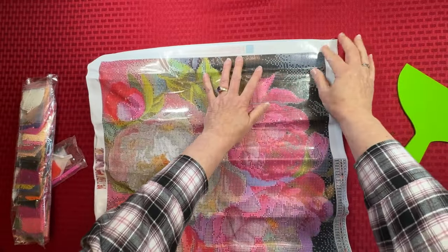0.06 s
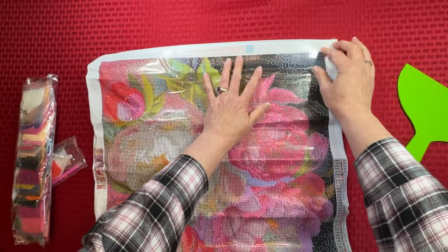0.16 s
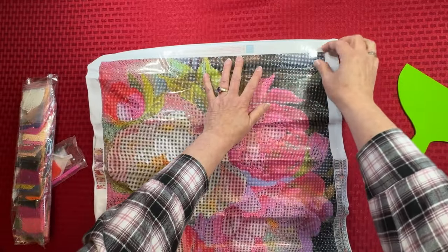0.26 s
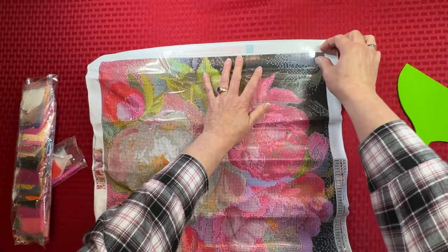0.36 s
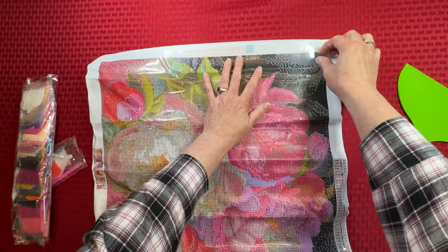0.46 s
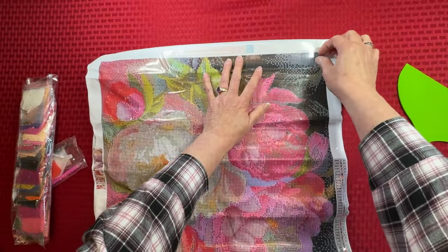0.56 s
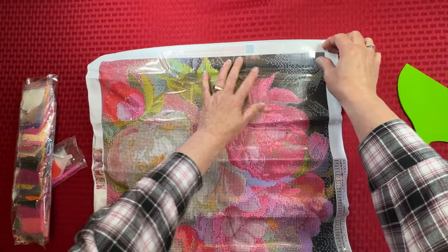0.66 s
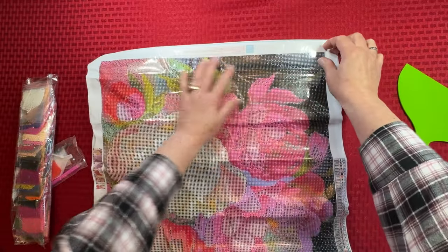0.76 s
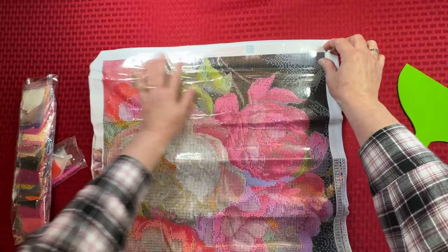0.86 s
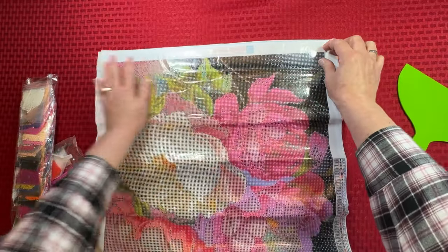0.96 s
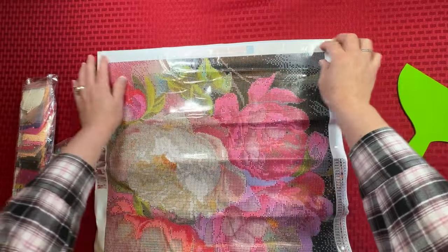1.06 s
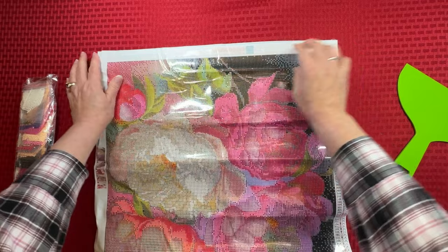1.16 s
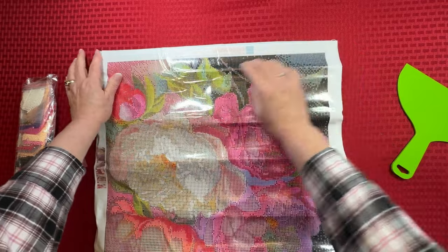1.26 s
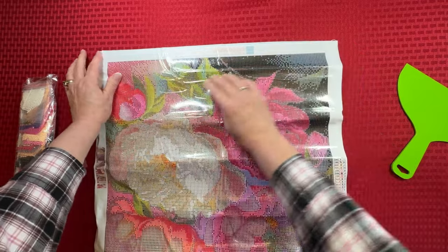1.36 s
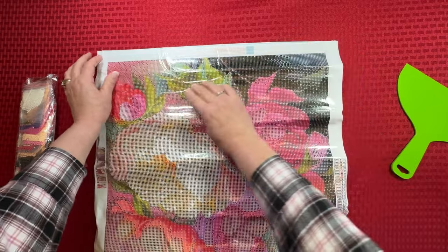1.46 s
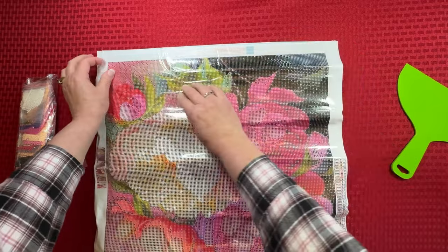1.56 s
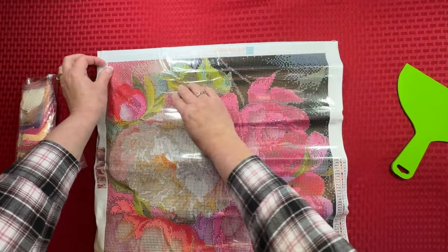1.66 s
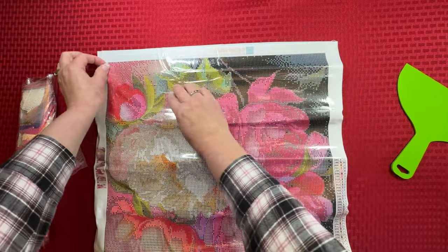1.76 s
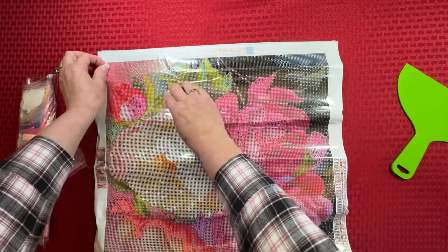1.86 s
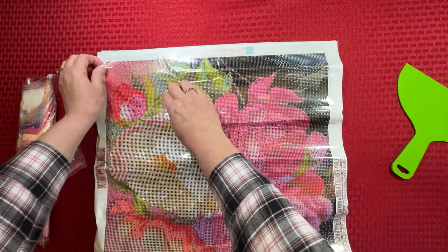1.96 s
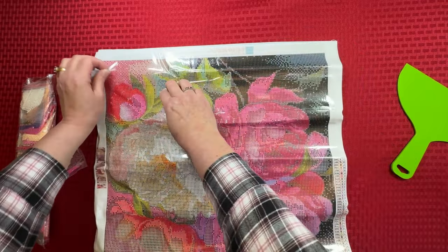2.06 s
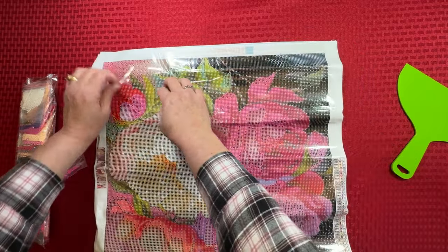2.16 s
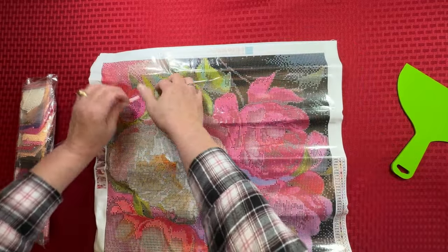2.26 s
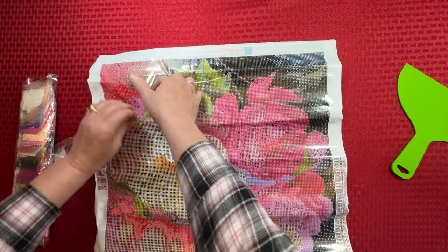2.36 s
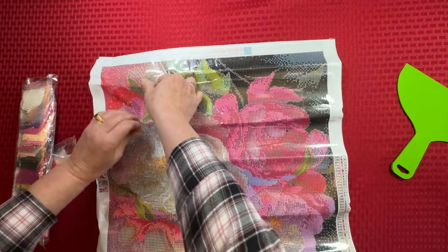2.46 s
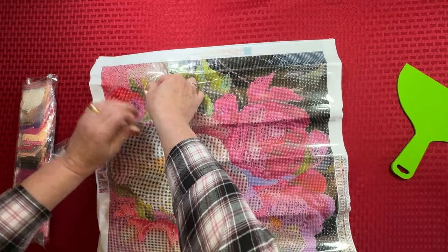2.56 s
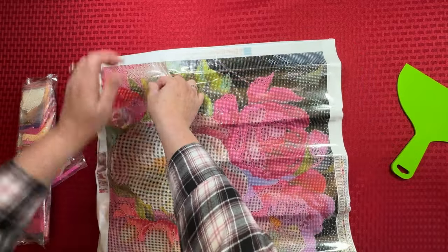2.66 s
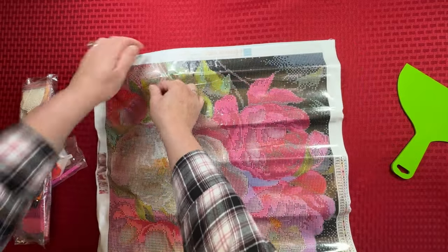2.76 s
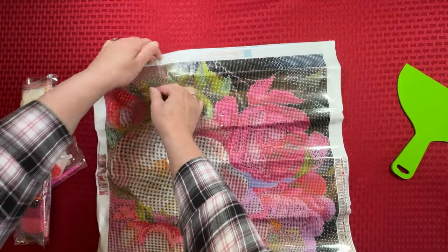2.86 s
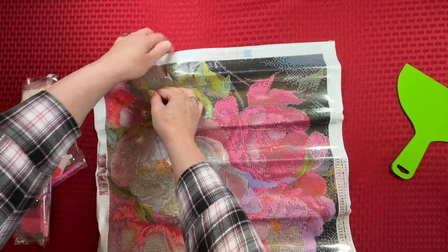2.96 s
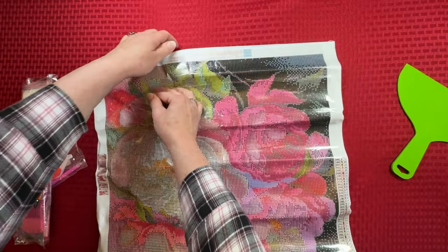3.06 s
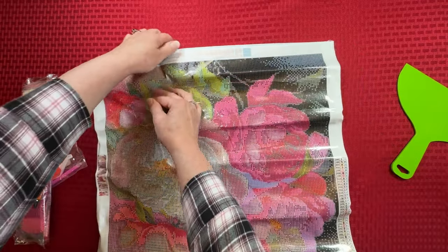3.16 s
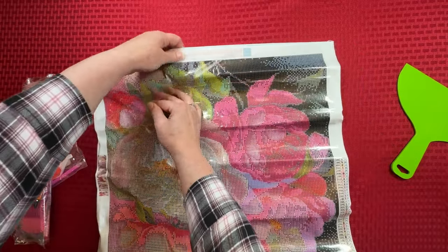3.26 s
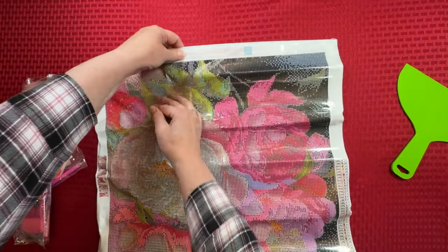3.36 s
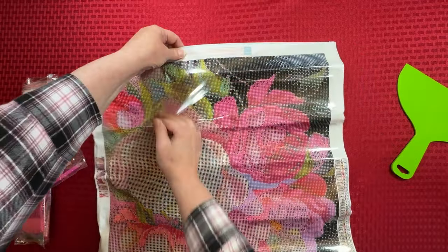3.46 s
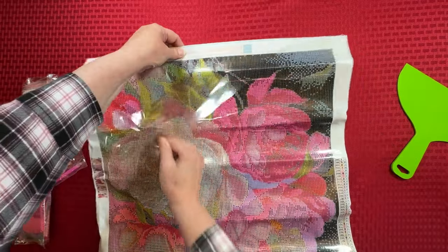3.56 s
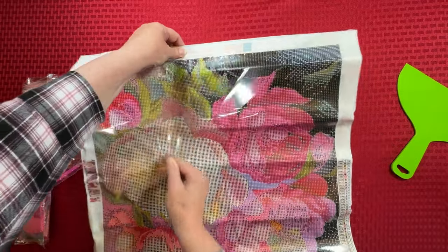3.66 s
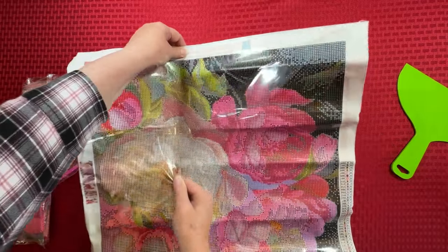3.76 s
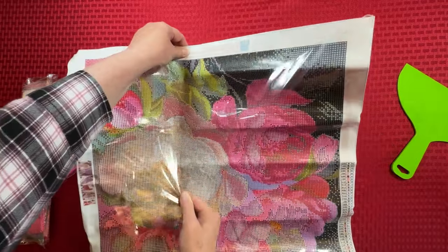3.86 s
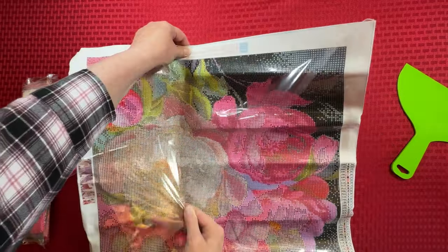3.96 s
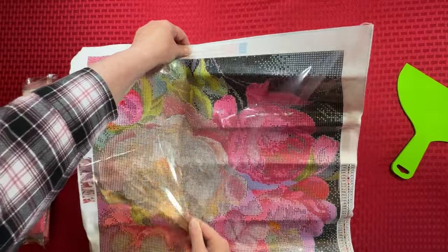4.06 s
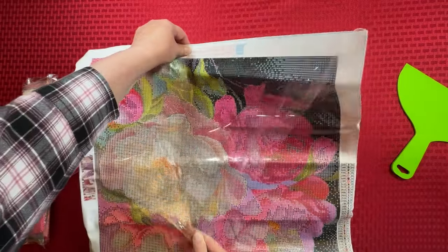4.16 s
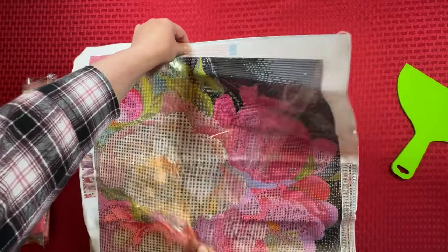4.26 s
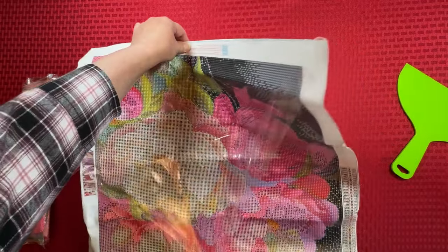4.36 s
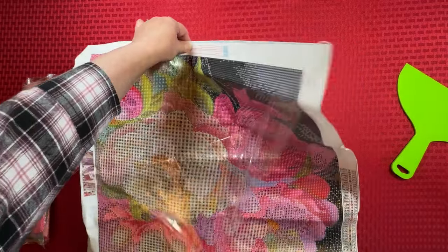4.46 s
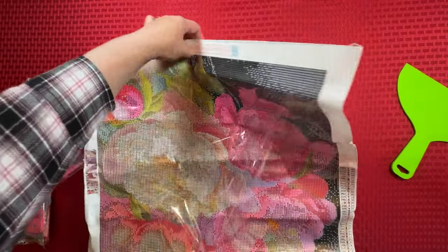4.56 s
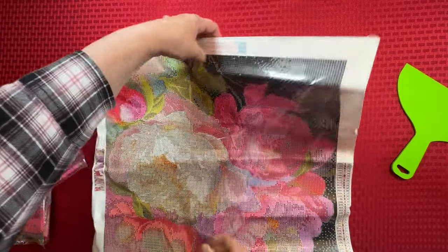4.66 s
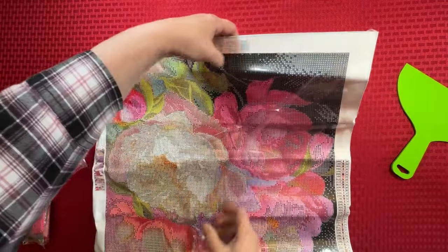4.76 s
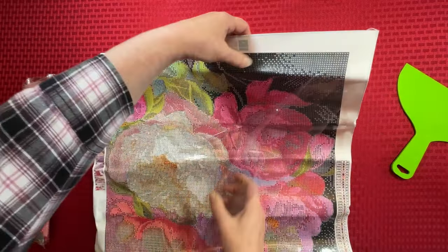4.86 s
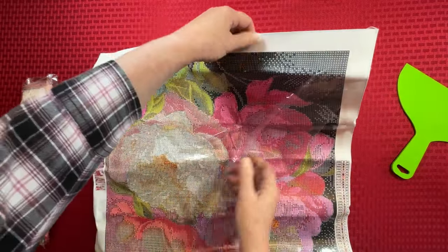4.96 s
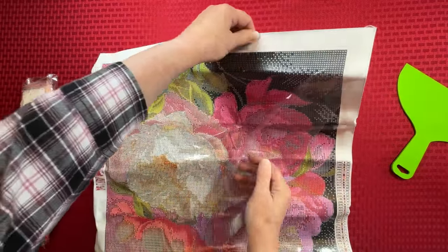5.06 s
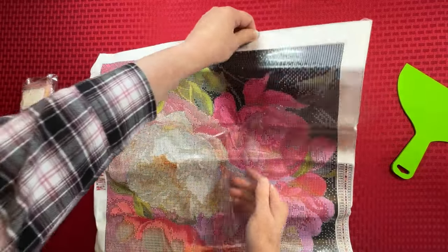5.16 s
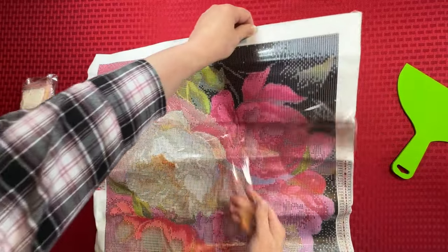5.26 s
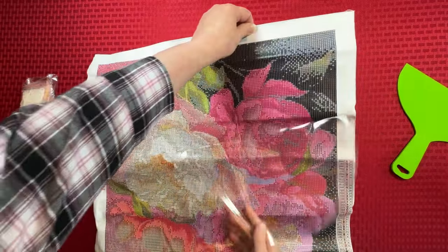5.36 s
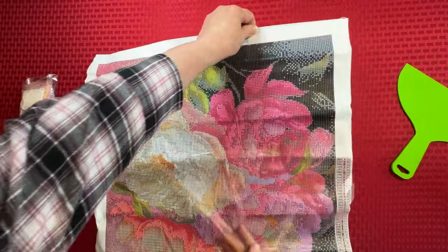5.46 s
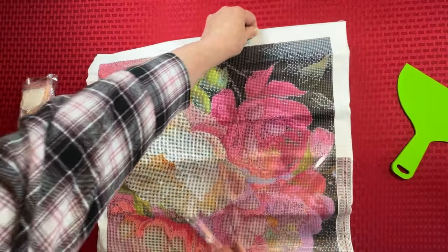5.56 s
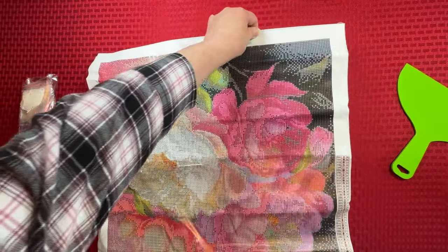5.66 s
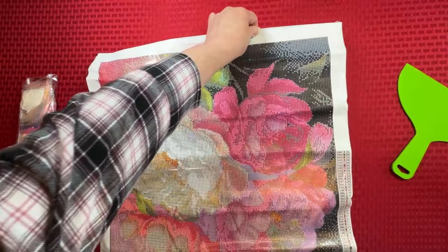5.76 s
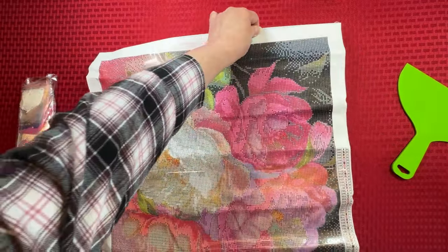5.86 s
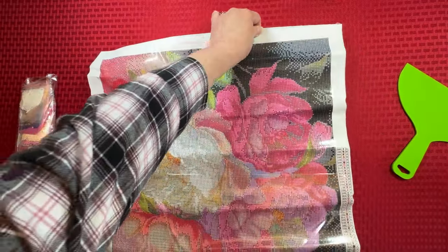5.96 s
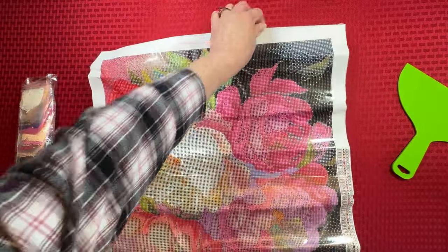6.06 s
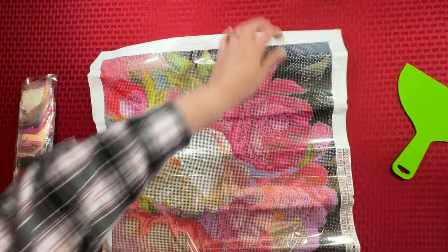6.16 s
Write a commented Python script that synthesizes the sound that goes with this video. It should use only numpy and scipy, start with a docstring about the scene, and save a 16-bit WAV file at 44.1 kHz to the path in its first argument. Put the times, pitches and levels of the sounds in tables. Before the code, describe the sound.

Close stereo microphones in a small, quiet room with low rumble and faint hum. Hands barely rustle thin plastic film and pat softly on a padded table. Crisp ticks gather into brisk crinkles as the film is picked at, then a rough peeling rustle with sharp snaps pulls slightly rightward. Louder crackles and crumples follow, easing toward the end.

```python
"""Clear plastic film crinkles as hands smooth a craft canvas, pick at its cover film and peel it back.
Creases are short resonant bursts of noise: many tiny ones crinkle, large ones snap, and runs of them crumple.
Rubbing and flutter are rough, coloured noise; ringing resonances add the film's own pitch and thin whistles.
Soft, quickly damped knocks make the hollow flexes of the sheet and the pats of hands on a padded table.
A small room adds short reflections, with a low rumble and hum behind a close pair of microphones."""
import sys
import numpy as np
from scipy import signal
from scipy.fft import rfft, irfft, next_fast_len
from scipy.io import wavfile
from scipy.ndimage import uniform_filter1d

SR = 44100
rng = np.random.default_rng(int(sys.argv[2]) if len(sys.argv) > 2 else 0)


def unload_audio(sound):
    """Save the sound as a 16-bit wav file, at the path given as the first command line argument."""
    columns = np.transpose(np.atleast_2d(sound))
    # keep every value between -1 and 1, then stretch to whole-number steps
    steps = np.round(np.clip(columns, -1, 1) * 32767)
    wavfile.write(sys.argv[1], SR, steps.astype(np.int16))


N = 273537
TIME = np.arange(N) / SR

# Levels of the film and hands are those before the room and the microphones.

# Moves of the hands on the film. Each row: time of full strength in seconds, rise in seconds,
# hold in seconds, release in dB per second, crinkle level in dB, rubbing level in dB,
# brightness in dB per octave.
STROKES = [(0.007, 0.16, 0.093, 36, -57, -62, 11), (0.619, 0.01, 0.0082, 120, -60.5, -68, 0),
           (0.805, 0.11, 0.091, 70.5, -44, -55.5, 3.5), (1.35, 0.1, 0.13, 76, -59.5, -64, 18),
           (1.565, 0.0096, 0.012, 160, -42.5, -54, 0.5), (1.927, 0.081, 0.015, 173, -46, -64.5, 10),
           (2.006, 0.011, 0.0072, 152, -48, -52, 9), (2.134, 0.14, 0.028, 138, -33, -48, -2.5),
           (2.3, 0.15, 0.035, 74, -30.5, -46.5, -1), (2.574, 0.01, 0.0045, 308, -33, -52.5, -4.5),
           (2.879, 0.21, 0.011, 117, -39, -45, 1.5), (3.022, 0.018, 0.015, 67, -43, -47.5, 6),
           (3.238, 0.07, 0.33, 65, -42.5, -49.5, -2.5), (4.567, 0.22, 0.17, 102, -34, -42, -1),
           (4.866, 0.057, 0.13, 282, -41.5, -49.5, -0.5), (5.146, 0.084, 0.013, 90, -26, -35.5, -5.5),
           (5.279, 0.081, 0.02, 106, -24, -36.5, -1), (5.505, 0.84, 0.0058, 35, -34, -49, 2.5),
           (5.888, 1, 0.02, 112, -44, -56.5, 0.5), (6.121, 0.025, 0.019, 55, -44.5, -56.5, -0.5)]
RISE_DB = 23.5   # a move swells by this much during its rise
# The long pull that peels the film back. Each row: time in seconds, crinkle level in dB and
# rubbing level in dB, both before the trim below.
PEEL = [(3.452, -35, -46), (3.836, -34, -36.5), (3.875, -27.5, -33), (3.988, -36, -36.5), (4.068, -29, -34),
        (4.201, -33.5, -33.5), (4.26, -27, -33.5), (4.48, -39.5, -53.5)]
# Trim of the peel: crinkle in dB, then rubbing in dB.
PEEL_TRIM_DB = (1, -3.5)
PEEL_FADE_DB_PER_S = 251   # how fast the pull starts and stops
# Tone of the crinkling. Each row: frequency in Hz, relative level in dB.
CRINKLE_COLOUR = [(900, 4.5), (2000, -3.5), (4000, -5), (8300, -0.5), (9400, -11.5), (10600, 6),
                  (15500, -7.5)]
# Single creases snapping through. Each row: start in seconds, peak in dB, pitch in Hz.
SNAPS = [(0.1111, -35, 7100), (0.7816, -21, 11300), (0.8044, -14.5, 11700), (0.956, -22.5, 10700),
         (1.3845, -22.5, 15400), (1.509, -34.5, 3500), (1.6132, -22, 10600), (1.9458, -16.5, 7240),
         (2.0088, -13, 7100), (2.0178, -19.5, 7880), (2.2518, -13, 7900), (2.4304, -16.5, 11100),
         (2.446, -12.5, 6000), (2.4704, -24, 10800), (2.4942, -17, 10500), (2.5536, -24, 3430),
         (2.7598, -20, 6200), (2.7835, -27.5, 4800), (2.8943, -17.5, 6470), (2.9145, -20.5, 3030),
         (2.9612, -21.5, 7940), (3.0022, -22, 10500), (3.0165, -15.5, 7200), (3.1098, -17.5, 7400),
         (3.1288, -23, 10600), (3.1588, -16.5, 7900), (3.235, -14, 8160), (3.2464, -19, 7190),
         (3.2862, -18, 3800), (3.3428, -12, 10200), (3.3488, -18, 10700), (3.4602, -10.5, 10400),
         (3.8718, -8, 10900), (4.4468, -17.5, 11000), (4.523, -10.5, 6200), (4.665, -5, 6700),
         (4.6914, -7, 10700), (4.7144, -12.5, 6060), (4.758, -20, 7620), (4.7714, -21, 3470),
         (4.883, -15.5, 10800), (5.2265, -12, 6070), (5.5039, -15, 10720), (6.126, -11.5, 15500)]
# Several creases giving way in a run. Each row: start in seconds, peak in dB, length in seconds,
# pitch in Hz.
CRUMPLES = [(1.571, -23.5, 0.0049, 6130), (1.771, -22, 0.0017, 6900), (2.6417, -13.5, 0.0027, 5630),
            (3.3225, -16.5, 0.0035, 5050), (3.434, -14, 0.0033, 9100), (3.86, -10, 0.0044, 10300),
            (4.6134, -14.5, 0.0072, 7040), (5.062, -22, 0.0072, 6476), (5.2785, -13.5, .008, 9550)]
# Tone of the rubbing. Each row: frequency in Hz, relative level in dB.
RUBBING_COLOUR = [(400, -16), (850, -5), (1080, -4.5), (1350, 1), (1900, -2), (2700, -4.5), (4500, -5),
                  (9000, -61)]
# Tone of the sheet's low flutter. Each row: frequency in Hz, relative level in dB.
FLUTTER_COLOUR = [(100, -10), (200, -3), (330, -6), (450, 2), (570, -8.5), (800, 1.5), (1080, -1.5),
                  (2200, -13)]
FLUTTER_DB = -3   # relative to the rubbing
# Main resonance of the rubbed film, lower when more of it hangs loose. Each row: time in seconds,
# pitch in Hz, level in dB above the rubbing.
FILM_RESONANCE = [(0.9, 1770, -2.5), (1.28, 1402, -0.5), (3.42, 1340, 0), (3.6, 919, -2.5),
                  (3.95, 827, -1.5), (4.5, 847.3, -31), (5.2, 862, 0.5), (5.6, 867, -24)]
# Thin whistles of sliding film. Each row: start in seconds, end in seconds, level at the start in dB,
# fade in dB per second (negative swells).
WHISTLES = [(0.05, 0.63, -69.5, -3), (4.576, 5.067, -38.5, 46)]
WHISTLE_HZ, WHISTLE_WIDTH_HZ = 1924, 120
# The sheet flexing with a hollow pop. Each row: start in seconds, peak in dB, pitch in Hz.
FLEXES = [(1.284, -38, 1320), (1.331, -45, 1350), (2.866, -23.5, 1120), (2.974, -33.5, 1240),
          (3.324, -29, 1470), (4.649, -21, 1430)]
# Hands and canvas landing on the table. Each row: start in seconds, peak in dB, pitch in Hz.
PATS = [(0.26, -50, 223), (0.371, -41.5, 245), (0.44, -42.5, 180), (0.619, -48, 216), (1.595, -36, 228),
        (1.63, -45, 160), (2.821, -31.5, 137), (4.649, -37, 286)]
ROOM_T60_S = 0.22   # time for the room's tail to fall by 60 dB
WANDER_PER_S = 25   # how often the sound heads for another place on the film
# The sound moves to the right during the peel. Each row: time in seconds, lag of the left
# microphone in seconds.
LEFT_LAG = [(2.0, -.00004), (4.2, .00017)]
# Tone difference of the microphone pair, which each side takes a share of. Each row: frequency in Hz,
# left minus right in dB before those shares.
BALANCE = [(150, 0), (700, -4.5), (1300, -1.5), (2400, -0.5), (5000, -4.5), (10000, 1.5)]
# Tone of the background rumble. Each row: frequency in Hz, relative level in dB.
RUMBLE_COLOUR = [(35, -18), (60, -0.5), (135, -1.5), (180, -10), (300, -15), (600, -26), (2000, -35.5),
                 (9000, -42.5)]
RUMBLE_DB, HUM_HZ, HUM_DB = -55, 131.4, -60.5   # levels before the microphone ports
# Tone of the microphone ports. Each row: frequency in Hz, gain in dB; the end values carry on outwards.
PORTS = [(11500, 3), (12400, -6), (13300, -32), (14200, 12.5), (15600, 11)]
CUTOFF_HZ = 16100


def from_db(db):
    """Turn decibels into a gain."""
    return 10 ** (np.asarray(db) / 20)


def rms_one(x):
    """Scale a sound so that its average strength (rms) is 1."""
    return x / np.sqrt(np.mean(x ** 2) + 1e-20)


def in_time(rows):
    """Join the rows of a table by straight lines over time, one curve per column."""
    s, *columns = np.transpose(rows)
    return [np.interp(TIME, s, column) for column in columns]


def drift(rate):
    """Wander at random around 0 with a spread of about 1, taking a new target `rate` times a second."""
    knots = rng.standard_normal(4096)
    return np.interp(TIME * rate, np.arange(len(knots)), knots)


def pair(alike, size):
    """Left and right white noise; alike runs from 0 (unrelated) to 1 (the same)."""
    mid, side = rng.standard_normal((2, size))
    alike = np.clip(alike, 0, 1)
    return np.sqrt(1 + alike) * mid + np.sqrt(1 - alike) * side * [[1], [-1]]


def colour(x, points, amount=1):
    """Change the tone along a curve of Hz and dB, joined over the logarithm of frequency."""
    hz, level_db = np.transpose(points)
    size = next_fast_len(N + 4096)
    bins_hz = np.maximum(np.arange(size // 2 + 1) * SR / size, 1)
    gain = from_db(amount * np.interp(np.log(bins_hz), np.log(hz), level_db))
    return irfft(rfft(x, size) * gain, size)[..., :N]


def low_pass(x, order, cutoff_hz):
    """Soften everything above the cutoff."""
    return signal.sosfilt(signal.butter(order, cutoff_hz, fs=SR, output="sos"), x)


def resonate(x, hz, width_hz):
    """Ring at one pitch, like a damped spring, with gain 1 at the top of the resonance."""
    r = np.exp(-np.pi * width_hz / SR)
    forward = np.array([1, 0, -1]) * (1 - r * r) / 2
    feedback = [1, -(1 + r * r) * np.cos(2 * np.pi * hz / SR), r * r]
    return signal.lfilter(forward, feedback, x)


def add(out, s, sound, peak_db):
    """Place a stereo sound at a time with a given peak."""
    at = max(round(s * SR), 0)
    scaled = from_db(peak_db) * sound / np.abs(sound).max()
    out[:, at:at + sound.shape[1]] += scaled[:, :N - at]


def handling():
    """Crinkle dB, rubbing dB and brightness: each move swells, holds and dies away; the peel adds its pull."""
    s = np.transpose(PEEL)[0]
    outside_s = np.abs(TIME - np.clip(TIME, s[0], s[-1]))   # time before the peel's start or after its end
    peel_db = np.array(in_time(PEEL)) + np.array(PEEL_TRIM_DB)[:, None]
    power = from_db(peel_db - PEEL_FADE_DB_PER_S * outside_s) ** 2
    bright = 0
    for s, rise_s, hold_s, release, crinkle_db, rubbing_db, brightness in STROKES:
        swell_db = -RISE_DB * np.maximum(s - TIME, 0) / rise_s
        shape_db = swell_db - release * np.maximum(TIME - s - hold_s, 0)
        move = from_db(shape_db + np.array([[crinkle_db], [rubbing_db]])) ** 2
        power = power + move
        bright = bright + brightness * move[0]   # stronger moves count for more
    crinkle_db, rubbing_db = 10 * np.log10(power)
    return crinkle_db, rubbing_db, bright / power[0]


def crease(hz, width_hz, buckle_s, ring_s=0.0041, ring_db=-16, alike=0.47, lag_spread_s=.000015):
    """One crease buckles and the film around it rings briefly; its place sets the lag between the ears."""
    t = np.arange(512) / SR
    buckle = (t / buckle_s) ** 2 * np.exp(2 - 2 * t / buckle_s)
    ring = from_db(ring_db) * np.exp(-t / ring_s)
    left, right = resonate(pair(alike, len(t)) * (buckle + ring), hz, width_hz)
    lag_s = lag_spread_s * rng.standard_normal()
    return np.array([left, np.interp(t - lag_s, t, right, left=0, right=0)])


def grains(per_s, spread_db, size):
    """Random clicks: many small, a few large."""
    chance, strength, sign = rng.random((3, size))
    size_db = spread_db * np.minimum(-np.log(1 - strength), 4)
    return (chance < per_s / SR) * from_db(size_db) * np.sign(sign - .5)


def crinkle(level_db, brightness_db, per_s, spread_db, clump_db, stiff_db, count=28):
    """Tiny creases all over the film; harder handling sets off more, in clumps, and favours bright ones."""
    effort_db = level_db + 40
    rate = per_s * from_db(0.66 * effort_db + clump_db * drift(90))
    out = 0
    for hz in np.geomspace(3000, 14000, count):
        voice = rms_one(crease(hz, width_hz=2460, buckle_s=0.00047))
        tilt_db = (stiff_db * effort_db - brightness_db) * np.log2(7000 / hz)
        clicks = grains(rate / count, spread_db, N) * from_db(tilt_db)
        out = out + signal.oaconvolve(clicks[None], voice, axes=1)[:, :N]
    out = colour(out, CRINKLE_COLOUR)
    # even out the running strength over about 50 ms, then let the hands set the level
    power = uniform_filter1d(np.mean(out ** 2, axis=0), size=2200)
    return from_db(level_db) * out / np.sqrt(np.abs(power) + 1e-3 * power.mean())


def stray_ticks(peak_db, per_s, spread_db, count=5):
    """Bent creases spring back on their own, and stand out when the hands move little."""
    out = 0
    for hz in np.geomspace(5000, 15000, count):
        voice = crease(hz, width_hz=9000, buckle_s=.00025)
        clicks = grains(per_s / count, spread_db, N)
        out = out + signal.oaconvolve(clicks[None], voice / np.abs(voice).max(), axes=1)[:, :N]
    return from_db(peak_db) * out


def snaps(width, buckle_s, ring_db):
    """Large creases flip one at a time, each with its own pitch; width is a share of that pitch."""
    out = np.zeros((2, N))
    for s, peak_db, hz in SNAPS:
        add(out, s, crease(hz, width * hz, buckle_s, ring_db=ring_db), peak_db)
    return out


def crumples(per_s, width, count=6):
    """One buckle sets off its neighbours, large and small, in a run that dies away."""
    out = np.zeros((2, N))
    t = np.arange(SR // 8) / SR
    for s, peak_db, length_s, centre_hz in CRUMPLES:
        run = 0
        for hz in centre_hz * np.geomspace(.25, np.sqrt(2), count):
            dying = 1 / (1 + (t / length_s) ** 2)
            clicks = grains(per_s, 1, len(t)) * np.sqrt(hz / centre_hz) * dying
            voice = crease(hz, width_hz=width * hz, buckle_s=.0002)
            run = run + signal.fftconvolve(clicks[None], voice, axes=1)
        add(out, s, run, peak_db)
    return out


def friction(level_db, spectrum, rough_db, slips_per_s, alike):
    """Dense little slips, in uneven fits, shake the whole sheet; heard as rough, coloured noise."""
    slips = pair(alike, N) * from_db(rough_db * drift(slips_per_s))
    return from_db(level_db) * rms_one(colour(slips, spectrum))


def ringing(hz, width_hz):
    """A resonance kept ringing by friction, on a steady or moving pitch, with rms 1."""
    shake = low_pass(pair(0.29, N) + 1j * pair(0.64, N), 2, width_hz / 2)
    turns = np.cumsum(hz * np.ones(N)) / SR
    return rms_one(np.real(shake * np.exp(2j * np.pi * turns)))   # slow noise moved up to the pitch


def film_resonance(rubbing_db, width_hz, rough_db, slips_per_s):
    """Quick slips set the sheet's main resonance ringing; its pitch follows the free area of film."""
    hz, above_db = in_time(FILM_RESONANCE)
    rough = from_db(rough_db * drift(slips_per_s))
    return from_db(rubbing_db + above_db) * rms_one(ringing(hz, width_hz) * rough)


def whistles(edge_s, rough_db, slips_per_s):
    """Sliding over the textured sheet draws a thin, slightly rough tone that swells or fades."""
    level = 0
    for start, end, level_db, fade in WHISTLES:
        gate = np.clip(np.minimum(TIME - start, end - TIME) / edge_s, 0, 1)
        level = level + gate * from_db(level_db - fade * np.maximum(TIME - start, 0))
    rough = from_db(rough_db * drift(slips_per_s))
    return level * rms_one(ringing(WHISTLE_HZ, WHISTLE_WIDTH_HZ) * rough)


def knocks(table, damping, rise_s, dying_s, alike):
    """A soft contact stirs a broad, quickly damped resonance; damping is its width as a share of its pitch."""
    out = np.zeros((2, N))
    t = np.arange(SR // 5) / SR
    for s, peak_db, hz in table:
        push = pair(alike, len(t)) * (1 - np.exp(-t / rise_s)) * np.exp(-t / dying_s)
        push = low_pass(push, 4, hz * (1 + 1.4 * damping))
        once = resonate(push, hz, damping * hz)
        add(out, s, resonate(once, hz, damping * hz), peak_db)
    return out


def room(x, tail_db, early_db, echo_db, echo_s, wall_hz, count=4):
    """Table scatter, a near reflection and a short tail; paths change as the sound wanders over the film."""
    t = np.arange(SR // 3) / SR
    out = x
    places = np.array([drift(WANDER_PER_S) for _ in range(count)])
    for share in places / np.linalg.norm(places, axis=0):
        tail = pair(0, len(t)) * from_db(-60 * t / ROOM_T60_S) * (t > .002)
        early = pair(0.047, len(t)) * np.exp(-t / 0.015) * (t > .001)
        echo = pair(0.082, len(t)) * np.exp(-np.abs(t - echo_s) / 0.00023)
        response = from_db(tail_db) * rms_one(tail) + from_db(early_db) * rms_one(early)
        response = response + from_db(echo_db) * rms_one(echo)
        response = low_pass(response, 2, min(wall_hz, 18000))   # the walls dull the treble
        out = out + signal.fftconvolve(share * x, response / np.sqrt(len(t)), axes=1)[:, :N]
    return out


def background():
    """Low ventilation rumble, made of coloured noise, with a motor hum wavering in level and phase."""
    hum_level = from_db(HUM_DB + 0.98 * drift(17))
    hum = hum_level * rms_one(np.sin(2 * np.pi * HUM_HZ * TIME + .5 * drift(3.42)))
    return from_db(RUMBLE_DB) * rms_one(colour(pair(0.79, N), RUMBLE_COLOUR)) + hum


def scene():
    """Film and hands in the room; the sound drifts towards the right microphone as the film is peeled."""
    crinkle_db, rubbing_db, brightness_db = handling()
    film = crinkle(crinkle_db, brightness_db, per_s=1350, spread_db=4.0, clump_db=3.5, stiff_db=-0.2)
    film += stray_ticks(.5 * crinkle_db - 9.5, per_s=17, spread_db=4.5)
    film += snaps(width=0.63, buckle_s=0.0004, ring_db=-12)
    film += crumples(per_s=2000, width=1.0)
    film += friction(rubbing_db, RUBBING_COLOUR, rough_db=2.0, slips_per_s=650, alike=0.033)
    film += friction(rubbing_db + FLUTTER_DB, FLUTTER_COLOUR, rough_db=4.0, slips_per_s=350, alike=0.61)
    film += film_resonance(rubbing_db, width_hz=253, rough_db=3.5, slips_per_s=200)
    film += whistles(edge_s=0.034, rough_db=1.5, slips_per_s=510)
    film += knocks(FLEXES, damping=0.39, rise_s=0.00017, dying_s=0.0084, alike=0.61)
    film += knocks(PATS, damping=1.46, rise_s=0.00033, dying_s=0.026, alike=0.78)
    left, right = room(film, tail_db=-10.5, early_db=-2.5, echo_db=-12.0, echo_s=.0085, wall_hz=7940)
    left = np.interp(TIME - in_time(LEFT_LAG)[0], TIME, left)
    balanced = np.array([colour(left, BALANCE, 0.94), colour(right, BALANCE, -0.15)])
    return balanced + background()


def record(dry):
    """The microphone ports cut a notch in the high treble; a steep filter then removes the top."""
    through_ports = colour(dry, PORTS)
    return signal.sosfilt(signal.ellip(10, .2, 60, CUTOFF_HZ, fs=SR, output="sos"), through_ports)


dry = scene()
out = record(dry)
unload_audio(out)
```